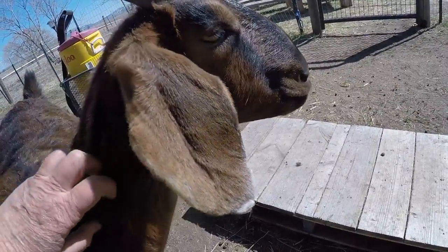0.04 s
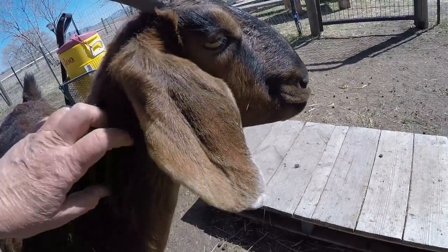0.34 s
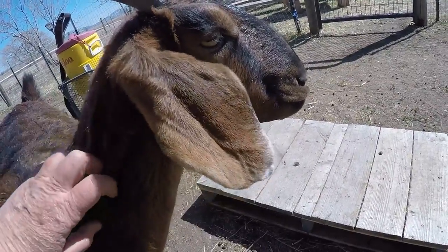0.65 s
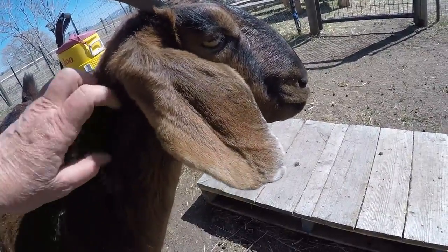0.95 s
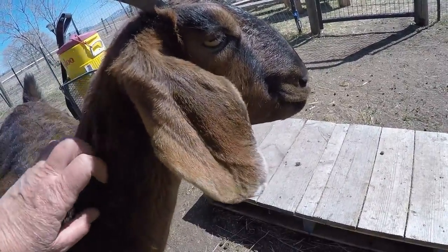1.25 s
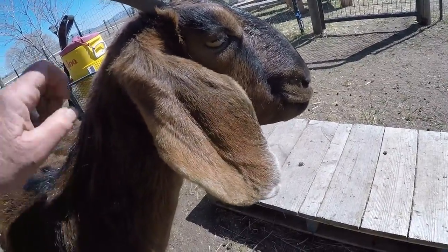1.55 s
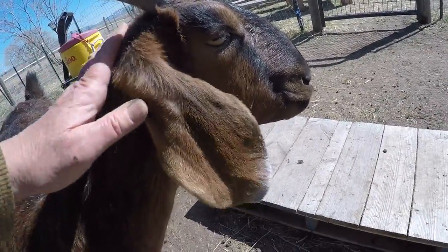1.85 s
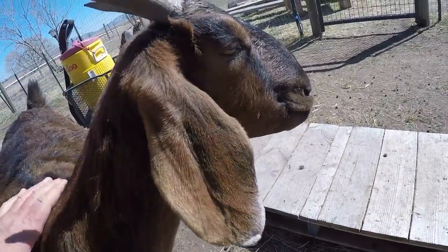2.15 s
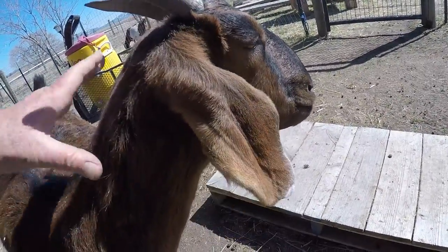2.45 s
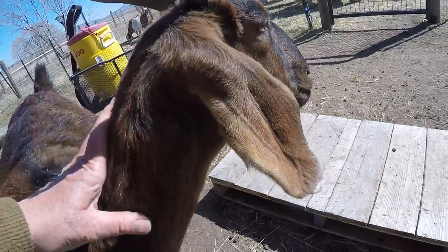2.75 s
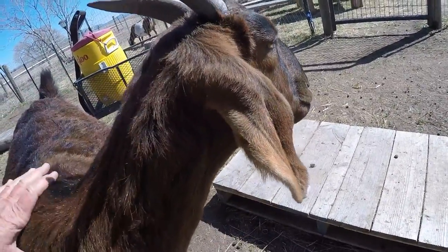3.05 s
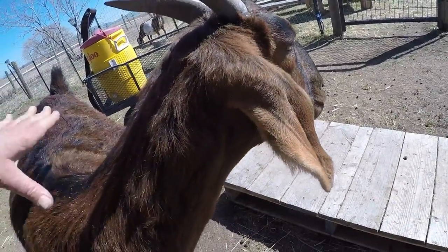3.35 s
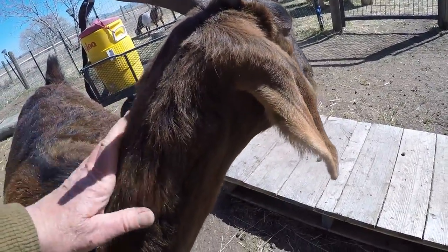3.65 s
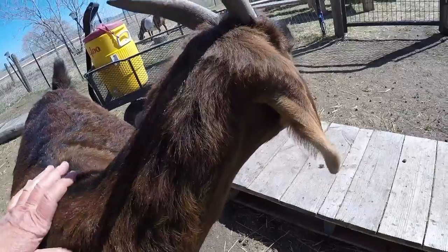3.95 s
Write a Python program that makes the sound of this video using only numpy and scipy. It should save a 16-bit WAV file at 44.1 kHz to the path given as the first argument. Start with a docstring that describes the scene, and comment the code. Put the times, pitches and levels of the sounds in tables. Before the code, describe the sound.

A hand rubs a goat's coat, quiet and close. Five quick, bristly fingertip scratches swish from the start to about 1.5 seconds. A light brush at 1.7 leads into three softer palm strokes near 1.9, 2.7 and 3.6 seconds. Light wind rumble, a low hum and soft outdoor hiss continue throughout, with two faint, short rasping chirps around 0.7 and 1.9 seconds.

```python
"""In a farmyard, a hand scratches a goat's neck five times with the fingertips, then strokes down it
three times with the palm. Each pass bends and releases countless short hairs, whose tiny snaps blend
into a swish. Around them are a faint wind rumble, a low hum, soft open-air hiss and two short, faint
rasping chirps. The sound is close and almost the same in both ears."""
import sys
import numpy as np
from scipy import signal
from scipy.fft import rfft, irfft
from scipy.io import wavfile
from scipy.ndimage import uniform_filter1d

SR = 44100
rng = np.random.default_rng(int(sys.argv[2]) if len(sys.argv) > 2 else 0)


def pcm_store(signal):
    """Save signal as 16-bit PCM."""
    levels = np.round(np.clip(np.atleast_2d(signal), -1, 1) * 32767)
    wavfile.write(sys.argv[1], SR, levels.astype(np.int16).T)


N = 176400
T = np.arange(N) / SR
BRISTLE_WIDTH_HZ = 1130


def from_db(db):
    """Turn decibels into a number to multiply a sound by."""
    return 10 ** (np.asarray(db) / 20)


def rms_one(x):
    """Scale a signal so that its average level (rms) is 1."""
    return x / np.sqrt(np.mean(x ** 2) + 1e-20)


def shaped(x, colour):
    """Make each frequency louder or softer, following a curve through points of Hz and dB."""
    hz, db = np.transpose(colour)
    bins_hz = np.maximum(np.arange(N // 2 + 1) * SR / N, 1)
    gain = from_db(np.interp(np.log(bins_hz), np.log(hz), db))
    return irfft(rfft(x) * gain, N)


def noise(colour):
    """Noise with the given tone colour, at level 1."""
    return rms_one(shaped(rng.standard_normal(N), colour))


def narrow(hz, width_hz):
    """Noise gathered around one pitch, which may move, at level 1."""
    phase = 2 * np.pi * np.cumsum(hz * np.ones(N)) / SR
    smoothing = signal.butter(2, width_hz / 2, fs=SR, output="sos")
    a, b = signal.sosfilt(smoothing, rng.standard_normal((2, N)))
    return rms_one(a * np.cos(phase) + b * np.sin(phase))


def drift(per_s):
    """A random wobble of typical size 1 that changes about per_s times a second."""
    bins_hz = np.arange(N // 2 + 1) * SR / N
    slow = irfft(rfft(rng.standard_normal(N)) / (1 + (bins_hz / per_s) ** 2), N)
    return rms_one(slow - slow.mean())


def steady(x, window_s=.12):
    """Even out slow swings in loudness, holding the level near 1."""
    size = int(window_s * SR)
    return x / np.sqrt(uniform_filter1d(uniform_filter1d(x ** 2, size), size))


def swell(start, rise, fall, db):
    """A loudness curve that rises to a rounded peak and falls to silence; times are in seconds."""
    up = np.clip((T - start) / rise, 0, 1)
    down = np.clip((T - start - rise) / fall, 0, 1)
    return from_db(db) * np.sin(up * np.pi / 2) * (1 - down) ** 1.08


def coat(speed, colour, spread_db=4.5, snap_share=.33):
    """Hairs bend and snap free. A faster hand frees more of them and makes a louder swish."""
    hairs_per_s = 1500 + 2500 * speed / speed.max()
    sizes = from_db(spread_db * np.minimum(rng.exponential(1, N), 5)) * rng.choice([-1, 1], N)
    snaps = rms_one(sizes * (rng.random(N) < hairs_per_s / SR))
    friction = np.sqrt(snap_share) * snaps + np.sqrt(1 - snap_share) * rng.standard_normal(N)
    return speed * rms_one(shaped(friction, colour))


def fingertips(snag_db=.65):
    """Quick, bristly scratches through the coat, with the skin rubbing dully underneath."""
    # Each row: start, rise and fall in seconds, peak in dB, bristle pitch in Hz, bristle peak in dB.
    scratches = [(-.05, .11, .25, -65.8, 5050, -72), (.305, .075, .16, -64.9, 5150, -75),
                 (.58, .05, .29, -63.4, 5400, -76), (.88, .07, .19, -63.3, 5100, -73),
                 (1.17, .085, .29, -61.2, 4750, -70)]
    # One long rub of the skin: start, rise and fall in seconds, peak in dB.
    skin_rub = (.05, .25, 2.1, -59)
    # The tone of the hair and of the skin. Each row: frequency in Hz, relative level in dB.
    hair_colour = [(500, -13), (1500, -11), (2700, -3.5), (4000, -3), (5200, -3.5), (6900, -3.5),
                   (8200, -9), (12000, -10.5), (15500, -8.5)]
    skin_colour = [(60, -27), (130, 4.5), (200, 6.5), (280, -11), (500, -16), (1500, -39.5)]
    speed = bristles = 0
    for start, rise, fall, db, bristle_hz, bristle_db in scratches:
        speed += swell(start, rise, fall, db)
        bristles += swell(start, rise, fall, bristle_db) * narrow(bristle_hz, BRISTLE_WIDTH_HZ)
    snags = from_db(snag_db * drift(per_s=55))   # the coat catches and lets go unevenly
    return snags * (coat(speed, hair_colour) + bristles) + swell(*skin_rub) * noise(skin_colour)


def low_hum(waver_db=1.0, wander_radians=.088):
    """Four low tones, each wavering a little in loudness and pitch."""
    # Each row: pitch in Hz, level in dB.
    tones = [(51, -47.5), (129, -68), (151, -70.5), (184, -76.5)]
    hum = 0
    for hz, db in tones:
        level = from_db(db + waver_db * drift(1.9))
        phase = 2 * np.pi * hz * T + wander_radians * drift(.65)
        hum += level * np.sqrt(2) * np.sin(phase)
    return hum


def wind_and_hum(wind_db=-42.5):
    """Light wind rumbles over the hum, and their deepest parts swell and sink together."""
    # The tone of the wind. Each row: frequency in Hz, relative level in dB.
    wind_colour = [(10, -12.5), (23, -3), (42, -0.5), (70, -5), (95, -13), (125, -18), (170, -34.5),
                   (320, -49.5), (700, -73.5)]
    # The deep part that swells. Each row: frequency in Hz, how much is let through in dB.
    gust_reach = [(58, 0), (85, -6.5), (150, -29.5)]
    # Each row: time in seconds, change in that deep part's level in dB.
    gusts = [(0, 0), (.2, -1.5), (.45, -2.5), (.6, 3.8), (.8, 1.2), (.95, -1.5), (1.07, 3.8), (1.22, 2.7),
             (1.37, -.5), (1.62, -.8), (1.73, 3), (2.0, 2.5), (2.13, -2.3), (2.29, -2), (2.38, 1.5),
             (2.87, .5), (3.07, -4.5), (3.52, .3), (3.73, -2), (3.9, 1)]
    rumble = from_db(wind_db) * steady(noise(wind_colour)) + low_hum()
    gust_gain = from_db(np.interp(T, *np.transpose(gusts)))
    return rumble + (gust_gain - 1) * shaped(rumble, gust_reach)


def open_air(db=-58.5, swing_db=.47):
    """The soft, nearly even hiss of the outdoors."""
    # Each row: frequency in Hz, relative level in dB.
    air_colour = [(60, 9.5), (120, 15), (170, 8), (230, 7.5), (310, 0.5), (400, 0.5), (560, -2.5),
                  (780, -2), (1150, -6.5), (2000, -9.5), (3200, -10), (5000, -12.5), (8000, -17),
                  (12000, -20.5), (15500, -23)]
    return from_db(db + swing_db * drift(3.7)) * noise(air_colour)


def hand_rustles():
    """The hand and the coat rustle softly and dully against each other."""
    # Each row: start, rise and fall in seconds, peak in dB.
    rustles = [(.32, .05, .13, -63.5), (.65, .05, .1, -66), (.92, .06, .12, -67), (1.56, .1, .16, -69),
               (2.74, .06, .08, -69), (3.24, .025, .05, -63), (3.34, .06, .08, -69)]
    # Each row: frequency in Hz, relative level in dB.
    rustle_colour = [(100, -12), (220, -1), (320, -2), (430, 1), (650, -10), (1500, -19), (4000, -26),
                     (12000, -38)]
    return sum(swell(*row) for row in rustles) * noise(rustle_colour)


def chirps(sag_hz_per_s=2600):
    """Two short rasps, each a narrow band of noise that slides down in pitch."""
    # Each row: start, rise and fall in seconds, pitch at the peak and width in Hz, peak in dB.
    rasps = [(.683, .055, .048, 1710, 290, -61.8), (1.85, .025, .035, 1300, 450, -66.5)]
    sound = 0
    for start, rise, fall, hz, width_hz, db in rasps:
        pitch = hz - sag_hz_per_s * np.clip(T - start - rise, -rise / 2, fall)
        sound += swell(start, rise, fall, db) * narrow(pitch, width_hz)
    return sound


def yard_echo(x, echo_db=-4, fade_s=1.5, cutoff_hz=1620):
    """Add the faint, dull, blurred echo that fences and sheds throw back."""
    tail = rng.standard_normal(N) * from_db(-60 * T / fade_s)
    tail /= np.sqrt(np.sum(tail ** 2))
    dull = signal.sosfilt(signal.butter(6, cutoff_hz, fs=SR, output="sos"), x)
    return x + from_db(echo_db) * signal.fftconvolve(dull, tail)[:N]


def hand_landing():
    """One fine, bright brush as the hand lands on the hair tips."""
    # The brush: start, rise and fall in seconds, peak in dB.
    touch = (1.728, .014, .019, -65.8)
    # Each row: frequency in Hz, relative level in dB.
    touch_colour = [(1500, -12), (5000, -4), (9500, -4.5), (13000, 0), (15500, 0)]
    return coat(swell(*touch), touch_colour)


def palm(uneven_db=.2, bristle_lag_s=.057):
    """Long, soft strokes run down the neck and over the shoulder, bristling once the palm presses in."""
    # Each row: start, rise and fall in seconds, neck peak and shoulder peak in dB,
    # bristle pitch in Hz, bristle peak in dB.
    strokes = [(1.85, .13, .21, -64.4, -75, 4500, -70), (2.65, .14, .29, -65.3, -70, 5300, -74),
               (3.55, .24, .33, -67.5, -78, 5000, -81)]
    # Each row: frequency in Hz, relative level in dB.
    palm_colour = [(500, -21), (1500, -8.5), (2700, -2), (4700, -4), (6800, -6.5), (8200, -11.5),
                   (12000, -13.5), (15500, -16)]
    power = bristles = 0
    for start, rise, fall, neck_db, shoulder_db, bristle_hz, bristle_db in strokes:
        neck = swell(start, rise, fall, neck_db)
        shoulder = swell(start + rise, rise=.29, fall=.26, db=shoulder_db)
        power += neck ** 2 + shoulder ** 2
        bristle_level = swell(start + bristle_lag_s, rise, fall / 2, bristle_db)
        bristles += bristle_level * narrow(bristle_hz, BRISTLE_WIDTH_HZ)
    speed = np.sqrt(power) * from_db(uneven_db * drift(45))
    return coat(speed, palm_colour) + bristles


def scene(side_lag_s=.012):
    """Everything sits in the centre; a faint, late copy widens the high sounds a little."""
    # The late copy. Each row: frequency in Hz, level in dB compared with the centre.
    side_colour = [(30, -55), (80, -58.5), (180, -27.5), (700, -38.5), (2800, -32), (5000, -23.5),
                   (15000, -19.5)]
    goat = fingertips() + hand_rustles() + hand_landing() + palm()
    yard = wind_and_hum() + open_air() + yard_echo(chirps())
    centre = goat + yard
    side = np.interp(T - side_lag_s, T, shaped(centre, side_colour))
    return np.array([centre + side, centre - side])


def record(dry, lowest_hz=12, highest_hz=15300):
    """Cut away the very deepest rumble and the very highest hiss."""
    low_cut = signal.butter(2, lowest_hz, "high", fs=SR, output="sos")
    top_cut = signal.ellip(14, .1, 80, highest_hz, fs=SR, output="sos")
    return signal.sosfilt(top_cut, signal.sosfilt(low_cut, dry))


dry = scene()
out = record(dry)
pcm_store(out)
```